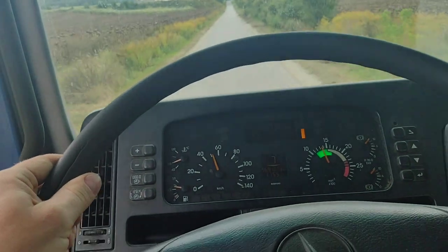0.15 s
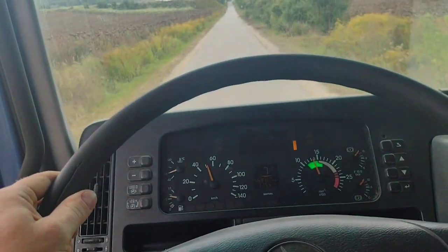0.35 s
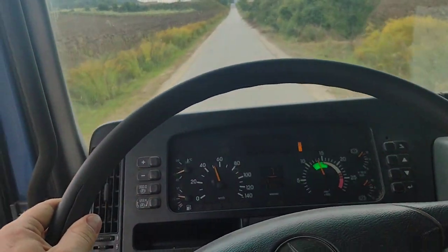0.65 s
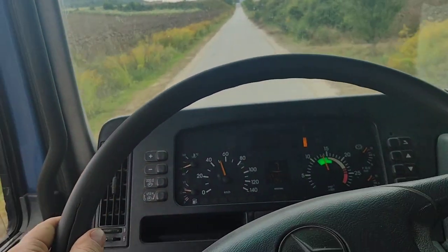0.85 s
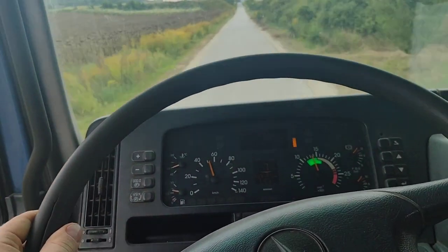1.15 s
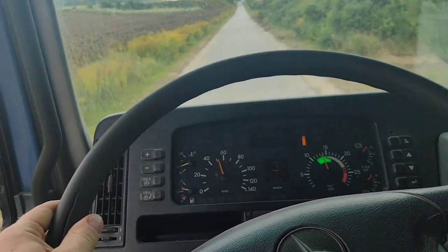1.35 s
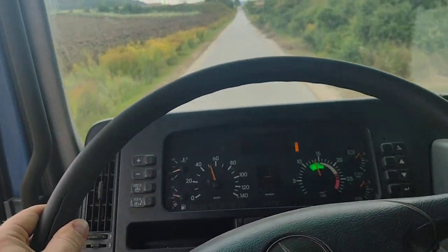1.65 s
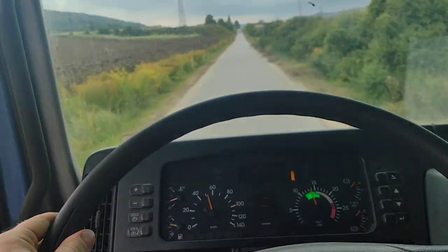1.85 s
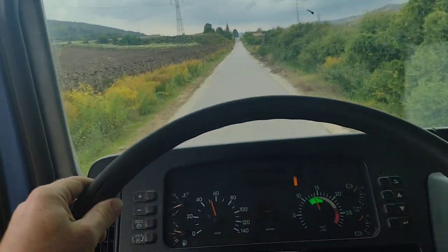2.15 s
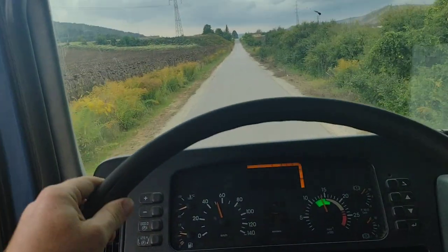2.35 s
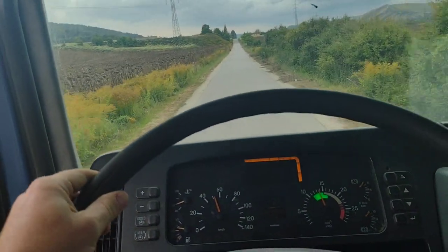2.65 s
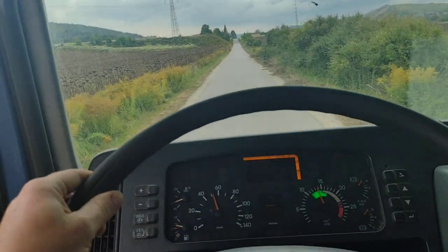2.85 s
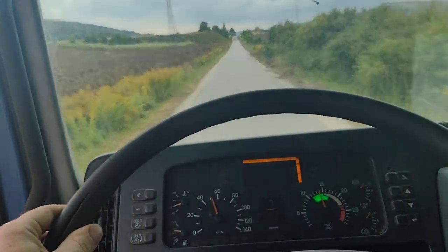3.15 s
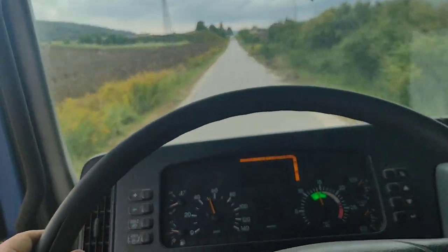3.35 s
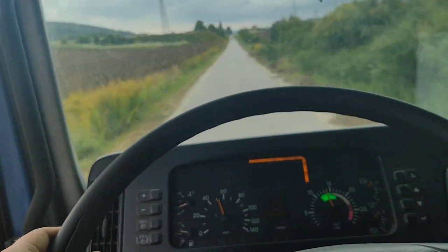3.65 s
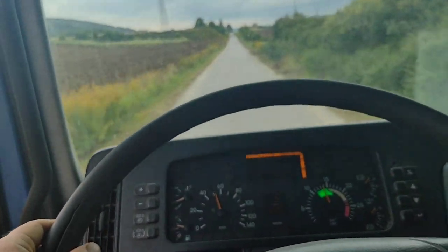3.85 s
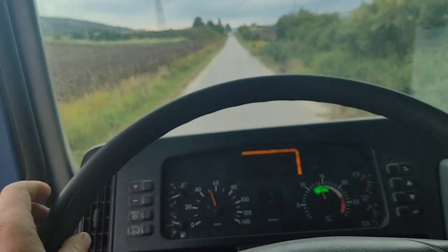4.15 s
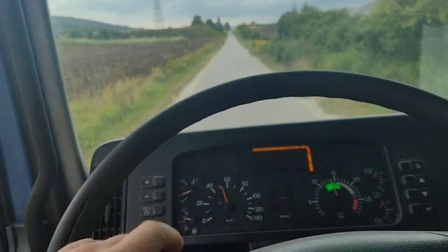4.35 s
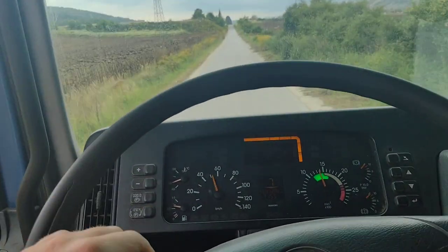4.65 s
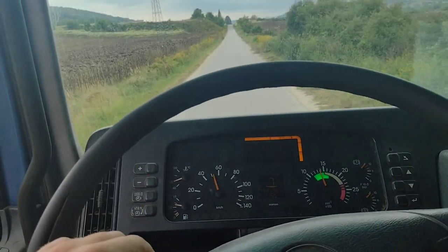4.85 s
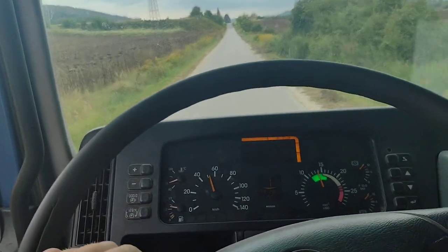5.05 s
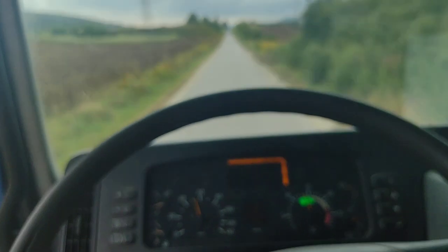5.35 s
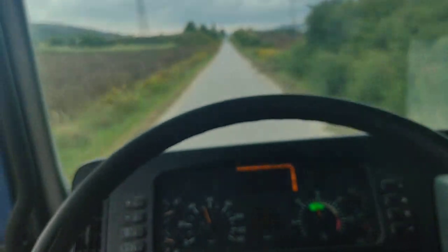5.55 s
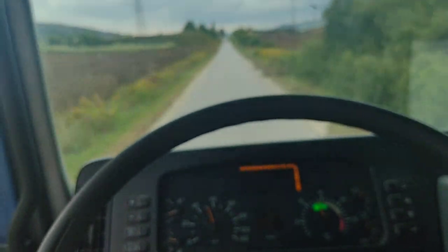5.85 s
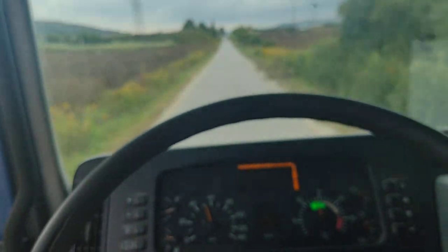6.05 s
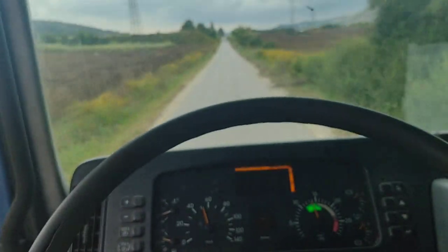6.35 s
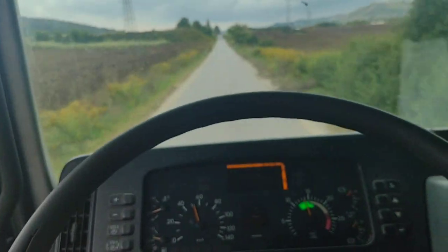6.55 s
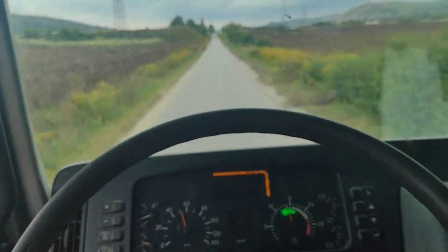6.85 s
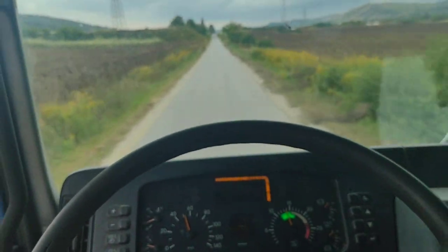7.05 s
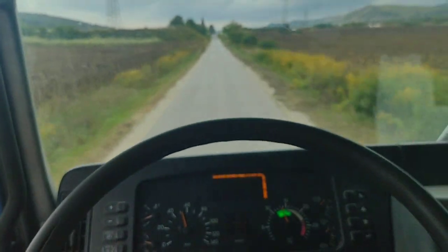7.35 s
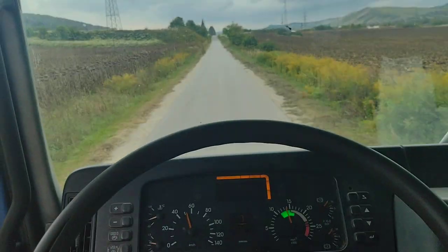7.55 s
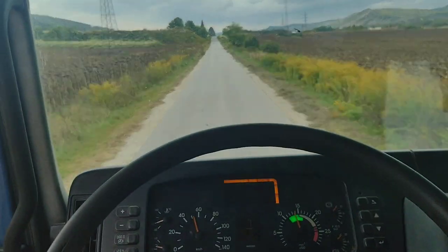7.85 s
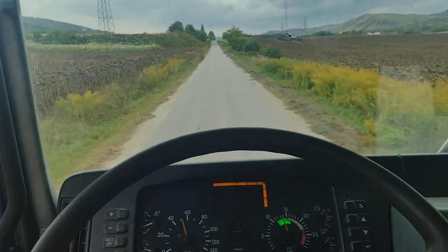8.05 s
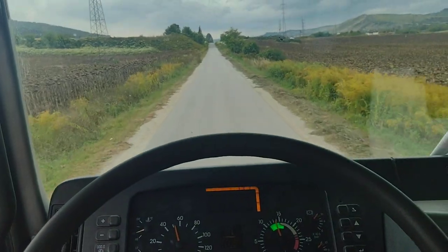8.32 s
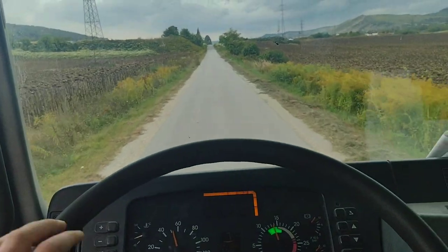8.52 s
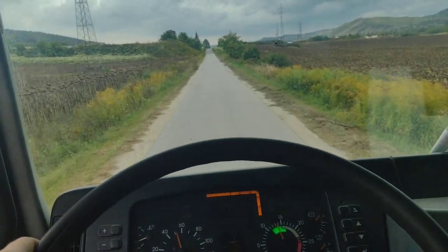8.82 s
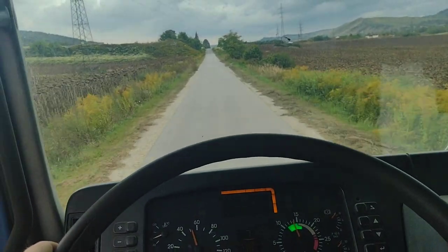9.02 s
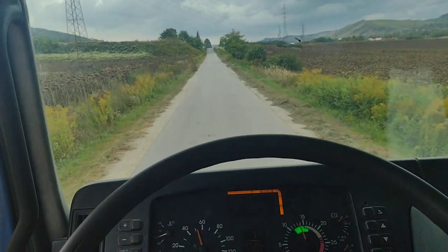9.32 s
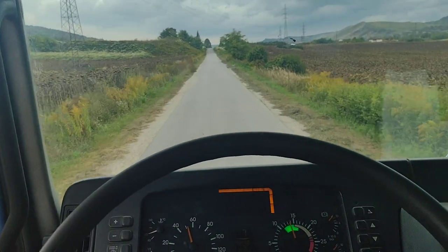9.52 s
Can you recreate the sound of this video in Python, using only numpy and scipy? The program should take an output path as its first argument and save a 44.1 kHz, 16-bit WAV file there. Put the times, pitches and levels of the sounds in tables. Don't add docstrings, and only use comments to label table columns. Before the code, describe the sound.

Inside the cab of a heavy diesel truck cruising a narrow rough road, heard from a phone near the wheel. Throughout, the engine holds a deep buzzing drone around 66 hertz, barely wavering, with light valve clatter above. It pulls slightly harder for the first two seconds, then eases. Dull road and wind noise fills the cab, and a hollow tyre hum near 210 hertz swells in patches, notably at 2.5, 4.2 and 7 seconds. Very low bumps thud and heave irregularly, stronger near 0, 1.2, 5.2, 5.7 and 8 seconds. Trim squeaks at 0.5 and 0.7; a stone ticks brightly at 1.04. A loud chirp and panel groan come at 1.26, creaks at 2.5 and 3.1, a thin high whistle at 3.4, more small squeaks from 3.7 to 5.5. Sparse faint squeaks follow at 7.7 and 8.5, a faint groan at 9, and the drone continues to the end near 9.7.

```python
import sys
import numpy as np
from scipy import signal
from scipy.fft import rfft, irfft
from scipy.io import wavfile
from scipy.ndimage import uniform_filter1d

SR = 44100
rng = np.random.default_rng(int(sys.argv[2]) if len(sys.argv) > 2 else 0)


def materialize(psi):
    bounded = np.clip(np.atleast_2d(psi).T, -1, 1)
    quanta = np.round(bounded * 32767).astype(np.int16)
    wavfile.write(sys.argv[1], SR, quanta)


def gain_from_db(level_db):
    decades = np.asarray(level_db, float) / 20
    return 10 ** decades


N = 426888
T = np.arange(N) / SR
HZ = np.maximum(np.fft.rfftfreq(N, 1 / SR), 1)

# (pitch_hz, level_db)
LEFT_MINUS_RIGHT = [(30, -1.9), (45, -1), (66, 1.5), (110, -4.5), (210, 2), (280, 0), (700, -2.5),
                    (1290, -3), (2050, -7.5), (3200, -6), (5000, -6), (8100, 5), (11000, 0.5), (15000, 6.5)]


def read(table):
    s, *columns = np.transpose(table)
    return [np.interp(T, s, c) for c in columns]


def along(points):
    hz, value = np.transpose(points)
    return np.interp(np.log(HZ), np.log(hz), value)


def bell(hz, width):
    return 1 / np.sqrt(1 + ((HZ - hz ** 2 / HZ) / width) ** 2)


def unit(x):
    return x / np.sqrt(np.mean(x ** 2))


def colour_noise(shape):
    return irfft(rfft(rng.standard_normal(N)) * shape, N)


def walk(rate):
    held = np.repeat(rng.standard_normal(int(N / SR * rate) + 2), 16)
    slewed = uniform_filter1d(uniform_filter1d(held, size=16), size=16)
    return np.interp(T * rate * 16, np.arange(len(held)), unit(slewed))


def swell(bumps, smooth_db):
    t = T[::256]
    size = gain_from_db(smooth_db)
    for s, db, half in bumps:
        size = size + gain_from_db(db) * np.exp(-((t - s) / half) ** 2)
    return np.interp(T, t, 20 * np.log10(size))


def ports(x, other=0):
    # (pitch_hz, share 0-1)
    likeness = [(40, 0.96), (215, 0.9), (300, .84), (380, .9), (480, .58), (680, .75), (800, .32),
                (1050, .58), (1200, .42), (1330, .64), (1450, .2), (1850, .33), (1950, .05), (2150, .38),
                (2700, .33), (2850, .2), (4500, .24), (5600, 0.12), (9000, 0.13)]
    # (pitch_hz, phase_radians)
    left_lead = [(0, 0), (560, .4), (690, .9), (820, 1.1), (920, 2.5), (1030, 3.2), (1380, 4), (1600, 5.8),
                 (1810, 9.4), (1950, 7.5), (2200, 6.6), (2500, 7.8), (2900, 9.1), (3600, 10.6),
                 (3800, 12.5), (4400, 15.6), (4700, 16.1), (5600, 16.5), (8440, 28.0), (10900, 34.5),
                 (12600, 37), (14500, 49), (15200, 42)]
    like = np.clip(along(likeness) + 0.017 * (HZ > 900), 0, 1)
    tilt = gain_from_db(along(LEFT_MINUS_RIGHT) / 2)
    mid = rfft(x) * np.sqrt((1 + like) / 2)
    side = other * np.sqrt((1 - like) / 2)
    late = np.exp(-1j * np.interp(HZ, *np.transpose(left_lead)))
    return irfft(np.array([(mid + side) * tilt, (mid - side) * late / tilt]), N)


def engine_cycle():
    # (start_s, firing_rate_hz)
    speed = [(0, 66.0), (.85, 66.2), (1.75, 66.4), (2.9, 66.65), (4.25, 66.55), (4.75, 66.75), (5.25, 66.4),
             (6.25, 66.6), (6.75, 66.3), (7.25, 66.8), (7.75, 66.6), (8.25, 66.25), (8.75, 66.95),
             (9.25, 66.35), (9.68, 66.55)]
    return 2 * np.pi * np.cumsum(read(speed)[0]) / SR / 6


def throttle():
    # (start_s, effort_db)
    effort = [(0, 2.5), (.35, 2.5), (.7, 1.5), (.94, 2.5), (1.8, 0.7), (2.45, 0), (3.04, -1), (4.47, 0.3),
              (5.63, -0.5), (8.76, -1), (9.68, -0.5)]
    return read(effort)[0]


def engine(cycle, effort_db):
    # (start_s, firing_tone_db, double_tone_db)
    load = [
        (0, -25, -37.5),
        (1.3, -25.5, -36.5),
        (2.2, -27.5, -37.5),
        (4.9, -28, -39),
        (6.7, -28.5, -37),
        (9.68, -28.5, -36),
    ]
    # (multiple of the cycle, level_db)
    orders = [(3, -39), (14, -54), (7, -52), (9, -51), (10, -53), (11, -53), (13, -54), (15, -55),
              (17, -52), (18, -50), (20, -50), (21, -54), (24, -52.5), (27, -57), (31, -61), (32.5, -55),
              (33, -58), (36, -60), (39.4, -54.5), (50, -63), (52, -63), (53, -63), (55, -54.5), (60, -63),
              (64, -51.8), (72, -65), (73, -66), (77, -67), (81, -67), (87, -65)]
    load_share = {9: .6, 10: .6, 24: 1.4, 64: -1.4}
    first_db, second_db = read(load)
    out = gain_from_db(first_db + .45 * walk(3)) * np.sin(6 * cycle)
    out = out + gain_from_db(second_db + .6 * walk(3)) * np.sin(12 * cycle + 1.3)
    for multiple, db in orders:
        level_db = db + load_share.get(multiple, 0) * effort_db + 1.1 * walk(1.5)
        phase = 2 * np.pi * rng.random() + .4 * walk(2.2)
        out = out + gain_from_db(level_db) * np.sin(multiple * cycle + phase)
    return np.sqrt(2) * out


def clatter(effort_db):
    # (pitch_hz, width_hz, level_db)
    cover = [
        (2010, 130, 4),
        (2187, 170, 1),
        (2350, 160, -7),
    ]
    level_db, taps_per_s, spread_db = -61, 500, 2.5
    chance = rng.random((3, N))
    size = gain_from_db(-spread_db * np.log(1 - chance[1])) * np.sign(chance[2] - .5)
    taps = (chance[0] < taps_per_s / SR) * size
    ring = sum(gain_from_db(db) / (1 + 1j * (HZ / hz - hz / HZ) * hz / width) ** 2 for hz, width, db in cover)
    ringing = unit(irfft(rfft(taps) * ring, N))
    return gain_from_db(level_db + effort_db + 1.9 * walk(9.8)) * ringing


def roar(cycle, effort_db):
    # (pitch_hz, level_db per Hz)
    spectrum = [(36, -63), (45, -58), (75, -49.5), (90, -58), (108, -54), (130, -61.5), (160, -63.5),
                (210, -60.5), (240, -64), (290, -65.5),
                (340, -67.5), (500, -69), (700, -72.5), (1100, -75), (1800, -76.5), (2050, -75.5),
            (2500, -81.5), (3200, -83.5), (5000, -84), (7500, -85), (9000, -89.5), (12000, -94),
            (14000, -99), (15700, -101)]
    # (pitch_hz, width_hz, level_db)
    resonances = [(365, 30, 4), (437, 30, 6), (580, 50, 3), (635, 25, 3), (738, 30, 4), (808, 15, 5.5),
                  (880, 60, 3), (2350, 200, 2), (3800, 400, 2), (3000, 500, 1), (963, 20, 5.5),
                  (1030, 25, 4), (1094, 30, 4), (1240, 25, 3), (1300, 20, 3), (1384, 20, 4.5),
                  (1580, 40, -4), (1650, 60, 1), (1900, 35, -6), (2004, 25, 2.5)]
    # (start_s, gust_db)
    wind = [(0, 4), (.35, 4.5), (.94, 1), (1.8, 3.5), (2.21, 1.7), (2.6, 1.8), (3.04, 2), (3.5, 2.5),
            (4.47, 2), (5.47, 1.5), (5.63, 2.5), (5.85, 1.7), (6.33, 2), (6.76, 0.7), (8.36, 1.5),
            (9.35, 2.4), (9.68, 3)]
    colour_db = along(spectrum) + sum(g * bell(hz, w) ** 2 for hz, w, g in resonances)
    colour = gain_from_db(colour_db) * np.sqrt(SR / 2) * (HZ > 30)
    noise = rfft(rng.standard_normal((2, N))) * colour
    gust, jiggle = walk(5.4), walk(14)
    panel_db = 0.63 * effort_db
    steady, panels, rattle, treble = [0 * T] + [db - np.mean(db) for db in (panel_db, effort_db, read(wind)[0])]
    swells = [steady] * 3 + [panels] * 3 + [rattle] + [treble] * 3
    out = 0
    for octave, swell_db in zip(range(5, 15), swells):
        window = np.cos(np.pi / 2 * np.clip(np.log2(HZ) - octave, -1, 1)) ** 2
        shared_db = (octave > 9) * .28 * gust + (9 < octave < 13) * .35 * jiggle
        own_db = (1.1 if octave == 11 else .6) * walk(9)
        throb = 1 + .07 * (8 < octave < 12) * np.cos(6 * cycle)
        out = out + gain_from_db(swell_db + shared_db + own_db) * throb * irfft(noise * window, N)
    return ports(out[0], rfft(out[1]))


def tyre_boom():
    # (peak_s, peak_db, half_length_s)
    patches = [(0.3, -39, 0.23), (0.83, -35, 0.21), (1.11, -37.5, 0.049), (1.34, -37, 0.069),
               (1.63, -41, 0.29), (1.98, -40, 0.14), (2.49, -30.5, 0.12), (2.8, -35.5, 0.082),
               (3.05, -37.5, 0.14), (3.52, -37, 0.044), (3.57, -35, 0.58), (3.89, -48, 0.039),
               (4.18, -29.5, 0.035), (4.39, -33.5, 0.037), (4.61, -30.5, 0.059), (4.89, -33, 0.17),
               (5.16, -35, 0.044), (5.35, -33, 0.08), (5.54, -33, 0.029), (6.06, -41, 0.033),
               (6.07, -32.5, 0.29), (6.47, -38, 0.058), (6.77, -34, 0.047), (7.05, -31.5, 0.23),
               (7.5, -37, 0.065), (7.86, -33.5, 0.24), (8.22, -36, 0.045), (8.66, -33, 0.37),
               (9.25, -32.5, 0.17), (9.62, -32, 0.065)]
    db = swell(patches, -42.5)
    main = np.sin(2 * np.pi * 212.3 * T + 0.97 * walk(3.5))
    above = gain_from_db(-13) * np.sin(2 * np.pi * 217.5 * T + 1.1 * walk(2.77))
    below = gain_from_db(-22.5) * np.sin(2 * np.pi * 208.5 * T)
    return np.sqrt(2) * gain_from_db(db + 2.0 * walk(14)) * (main + above + below)


def heave(modes, db):
    x = colour_noise(np.sqrt(sum((gain_from_db(g) * bell(hz, w) ** 2) ** 2 for hz, w, g in modes)))
    power = uniform_filter1d(x ** 2, int(.13 * SR)) + 0.011 * np.mean(x ** 2)
    return gain_from_db(db) * x / np.sqrt(power)


def floor_shake():
    # (pitch_hz, width_hz, level_db)
    modes = [
        (23, 2.5, 0),
        (30, 2.2, -5),
        (33.5, 2.2, -6),
    ]
    # (peak_s, peak_db, half_length_s)
    jolts = [(0.0, -16, 0.033), (0.2, -34, 0.24), (0.51, -37, 0.06), (0.88, -28, 0.25), (1.22, -21, 0.04),
             (1.51, -31, 0.24), (1.93, -33.1, 0.07), (2.16, -46, 0.1), (2.55, -30, 0.24),
             (3.03, -24.5, 0.076), (3.31, -38, 0.06), (3.55, -32, 0.046), (3.75, -31, 0.5),
             (4.49, -31, 0.16), (5.01, -25.5, 0.23), (5.18, -18, 0.041), (5.45, -31.5, 0.062),
             (5.68, -18.5, 0.054), (5.98, -25.5, 0.06), (6.21, -29, 0.1), (6.73, -34, 0.2),
             (7.13, -26, 0.1), (7.37, -22, 0.055), (7.7, -30, 0.12), (8.0, -18, 0.052),
             (8.29, -24.5, 0.065), (8.55, -39, 0.074), (8.66, -25, 0.15), (9.05, -25, 0.12),
             (9.58, -33, 0.16)]
    return heave(modes, swell(jolts, -34))


def seat_heave():
    # (pitch_hz, width_hz, level_db)
    modes = [
        (4.5, 1.8, -14),
        (12.5, 2.4, -3.5),
        (16, 2.8, -1.5),
    ]
    # (peak_s, peak_db, half_length_s)
    bumps = [(0.04, -32, 0.091), (0.33, -19.5, 0.068), (0.61, -25.5, 0.17), (1.03, -27.5, 0.054),
             (1.26, -24, 0.14), (1.43, -30, 0.071), (1.74, -19.5, 0.073), (2.01, -18, 0.13),
             (2.1, -33, 0.073), (2.67, -37.5, 0.38), (2.83, -29, 0.11), (3.26, -26.5, 0.23),
             (3.35, -24, 0.05), (3.66, -24, 0.18), (4.35, -16.5, 0.039), (4.83, -20, 0.06),
             (4.92, -38, 0.3), (5.46, -38, 0.073), (5.73, -21, 0.12), (6.34, -23.5, 0.21),
             (6.59, -18, 0.029), (6.75, -21.5, 0.078), (7.15, -40, 0.048), (7.33, -21, 0.057),
             (7.71, -25.5, 0.31), (8.06, -25, 0.055), (8.73, -22.5, 0.23), (8.88, -20, 0.1),
             (9.43, -25, 0.23), (9.45, -29, 0.065)]
    return heave(modes, swell(bumps, -32))


def cab(x):
    t60_s, wet_db = .1, -8
    t = T[:SR // 4]
    tails = rng.standard_normal((2, len(t))) * gain_from_db(-60 * t / t60_s) * (t > .002)
    tails = tails / np.sqrt(np.sum(tails ** 2, axis=1, keepdims=True))
    heard = x + gain_from_db(wet_db) * signal.fftconvolve(x[None], tails, axes=1)[:, :N]
    return irfft(rfft(heard) * gain_from_db(along(LEFT_MINUS_RIGHT) * np.array([[.7], [-.7]])), N)


def rub(s, length):
    at = slice(int(s * SR), int((s + length) * SR))
    t = T[at] - s
    return at, t, np.sin(np.pi * np.abs(t / length) ** 0.63)


def squeaks():
    # (start_s, length_s, slip_rate_hz, strongest multiple, level_db)
    slips = [(.507, .04, 1110, 6, -52), (.69, .05, 571, 13, -53), (1.272, .034, 564, 5, -56),
             (2.525, .045, 1960, 4, -53), (3.372, .06, 2275, 2, -55), (3.672, .043, 1190, 3, -53),
             (3.862, .037, 1090, 6, -56), (4.138, .04, 560, 3, -55), (4.304, .045, 1041, 3, -52),
             (4.475, .039, 700, 6, -57), (4.646, .04, 930, 6, -49), (5.2, .038, 1075, 3, -52),
             (5.302, .049, 970, 3, -57), (5.462, .04, 1040, 6, -56), (7.805, .03, 1060, 2, -54),
             (8.495, .033, 1130, 6, -54)]
    # (start_s, length_s, pitch_hz, level_db)
    whistles = [(.695, .03, 5600, -58), (.778, .02, 3700, -58), (1.262, .02, 6850, -48),
                (1.265, .01, 4400, -50), (1.276, .02, 2950, -54), (1.288, .024, 2760, -52),
                (1.282, .016, 1600, -48), (1.284, .02, 6300, -53), (1.324, .01, 3800, -50),
                (2.566, .016, 3620, -47), (2.615, .02, 6800, -51), (2.625, .025, 2950, -50),
                (3.186, .026, 2050, -46), (4.125, .03, 2050, -50), (4.155, .02, 2850, -51),
                (4.225, .025, 5150, -53), (4.44, .035, 3000, -52), (5.2, .035, 2150, -48),
                (5.315, .025, 2800, -50), (3.105, .04, 2240, -50), (3.174, .014, 2150, -48),
                (3.195, .035, 3640, -51), (3.347, .033, 6830, -46), (3.378, .034, 6790, -41),
                (3.4, .04, 6800, -50), (3.388, .032, 9150, -49), (2.845, .04, 3700, -54),
                (2.925, .05, 3000, -55), (4.135, .03, 5620, -50), (4.44, .035, 6300, -54),
                (4.48, .03, 3480, -49), (7.68, .04, 7500, -55), (7.77, .05, 7300, -54)]
    out = np.zeros(N)
    for s, length, hz, best, tone_db in slips + [(s, length, hz, 1, db) for s, length, hz, db in whistles]:
        at, t, shape = rub(s, length)
        k = np.arange(1, 12500 // hz + 1 if best > 1 else 2)[:, None]
        chance = rng.standard_normal((3, 32))
        wobble = np.cumsum(1 + 0.0065 * np.interp(t / length * 5, np.arange(32), chance[2])) / SR
        fade = 1 + (k * hz / 10300) ** 10 + (1500 / (k * hz)) ** 3
        size = gain_from_db(-7 + 2 * chance[0, :len(k), None]) * 4000 / (k * hz) / fade + (k == round(best))
        phase = 3 * chance[1, :len(k), None]
        tone = np.sum(size * np.sin(k * 2 * np.pi * hz * wobble + phase), axis=0)
        grip_db = 3 * np.interp(t / .005, np.arange(32), chance[2, ::-1])
        out[at] += shape * gain_from_db(tone_db + grip_db) * tone
    return out


def scrapes():
    # (start_s, length_s, level_db)
    rubs = [(.507, .04, -54), (.69, .14, -49), (1.083, .03, -53), (1.272, .045, -51), (2.525, .055, -47),
            (2.555, .1, -48), (3.128, .07, -50), (3.19, .045, -48), (3.672, .043, -54), (3.86, .037, -52),
            (4.133, .045, -55), (4.478, .045, -52), (4.642, .05, -53), (5.06, .035, -53), (5.2, .055, -50),
            (5.27, .03, -54), (5.45, .04, -54), (7.66, .07, -55), (7.805, .025, -54), (8.49, .033, -52)]
    out = np.zeros(N)
    hiss = unit(colour_noise(bell(5900, 6800) ** 3))
    for s, length, db in rubs:
        at, t, shape = rub(s, length)
        out[at] += shape * gain_from_db(db) * hiss[at]
    return out


def knocks():
    # (start_s, length_s, pitch_hz, peak_db)
    groans = [
        (.69, .05, 565, -38),
        (1.266, .045, 568, -32),
        (2.44, .04, 565, -42),
        (4.135, .045, 558, -41),
        (8.97, .1, 860, -46),
    ]
    out = np.zeros(N)
    for s, length, hz, db in groans:
        at = slice(int(s * SR), int((s + length) * SR))
        out[at] += gain_from_db(db) * np.sin(np.pi * (T[at] - s) / length) * np.sin(2 * np.pi * hz * T[at])
    return out


def tick():
    start_s, level_db, bright_hz, crack_gap_s = 1.0382, -32, 7200, .0017
    t = T - start_s
    rise = np.clip(t / .0025, 0, 1)
    fall = np.exp(-(np.abs(t) / .0095) ** 3) + .33 * np.exp(-np.abs(t) / .026)
    spatter = 1 - .3 * np.cos(2 * np.pi * t / crack_gap_s)
    noise = rfft(rng.standard_normal(N))
    bright = unit(irfft(noise * (bell(bright_hz, 5000) ** 3 + .07 * bell(13000, 8000)), N))
    dull = unit(irfft(noise * (bell(3600, 900) ** 2 + bell(2050, 500) ** 2), N))
    knock = dull * np.exp(-((t - .008) / .006) ** 2)
    return gain_from_db(level_db) * (rise * fall * spatter * bright + gain_from_db(-9) * knock)


def creaks():
    # (start_s, length_s, start_slip_rate_hz, end_slip_rate_hz, level_db)
    slips = [
        (1.25, .019, 2320, 2290, -38),
        (1.258, .04, 4600, 4000, -47),
        (2.533, .035, 850, 880, -45),
        (2.535, .06, 1680, 1800, -44),
        (2.584, .025, 940, 942, -37),
        (2.598, .034, 945, 935, -46.5),
        (3.124, .04, 1128, 1100, -40),
        (3.149, .045, 1072, 1058, -40.5),
    ]
    stacks = [
        (-22, -9, 0, -13),
        (0,),
        (-20, -6, -12, -8, -12, -14, -9, -9, -5, -16, -10),
        (0, -8),
        (-25, -8, -5, -10, -11, 0, -14, -18, -16, -17, -14, -22),
        (-25, -1, -4, -4, -5, -2, -3, -16, -14, -10, -14),
        (0, -8, -14, -10, -9, -12, -13, -16, -23),
        (-11, -6, 0, -15, -8, -15, -9, -14, -20, -13, -18, -22, -22),
    ]
    out = np.zeros(N)
    for (s, length, hz, end_hz, db), partials in zip(slips, stacks):
        at, t, shape = rub(s, length)
        k = np.arange(1, len(partials) + 1)[:, None]
        chance = rng.standard_normal((32, 16))
        slip = hz + (end_hz - hz) * t / length
        unsteady = 1 + .006 * np.interp(t / length * 6, np.arange(16), chance[0])
        wobble = np.cumsum(slip * unsteady) / SR
        own = np.array([np.interp(t / .005, np.arange(16), row) for row in chance[2:]])
        size = gain_from_db(np.array(partials)[:, None] + 2.5 * own[:len(k)])
        phase = 3 * chance[1, :len(k), None] + .5 * own[-len(k):]
        tones = size * np.sin(k * 2 * np.pi * wobble + phase)
        out[at] += shape * gain_from_db(db) * np.sum(tones, axis=0)
    return out


def scene():
    cycle, effort_db = engine_cycle(), throttle()
    body = engine(cycle, effort_db) + tyre_boom() + floor_shake() + seat_heave() + knocks()
    trim = squeaks() + scrapes() + tick() + creaks()
    return ports(body) + ports(clatter(effort_db)) + roar(cycle, effort_db) + cab(trim)


def top_cut(x):
    return signal.sosfilt(signal.butter(12, 15765, fs=SR, output="sos"), x)


def record(dry):
    lift = gain_from_db(3 * np.clip((HZ - 12500) / 1000, 0, 1)) * (HZ < 15765)
    return top_cut(irfft(rfft(dry) * lift, N))


dry = scene()
out = record(dry)
materialize(out)
```